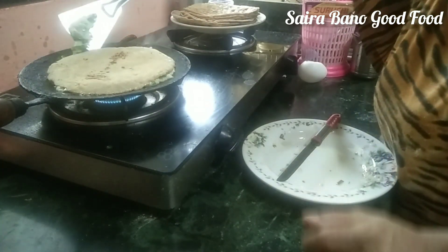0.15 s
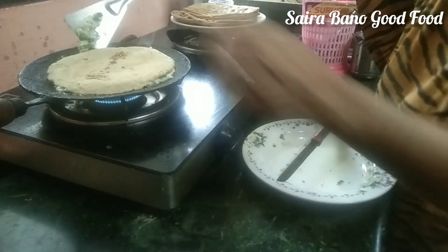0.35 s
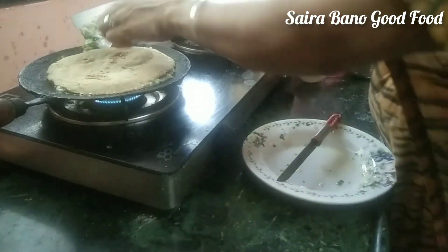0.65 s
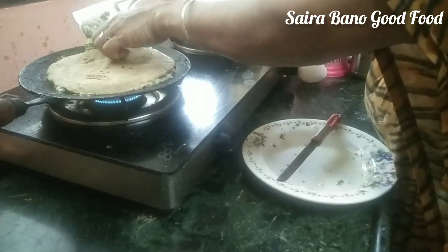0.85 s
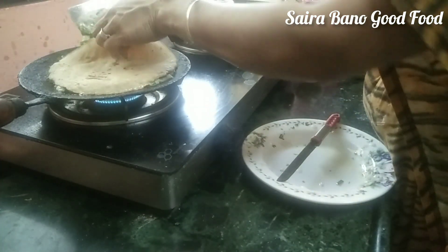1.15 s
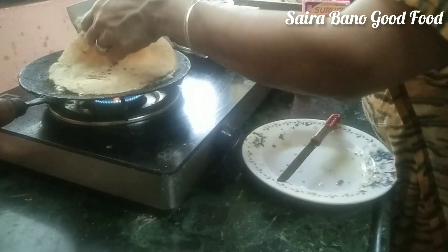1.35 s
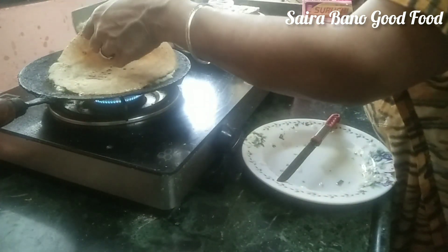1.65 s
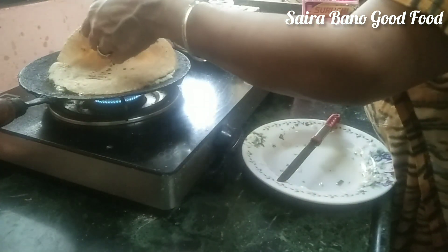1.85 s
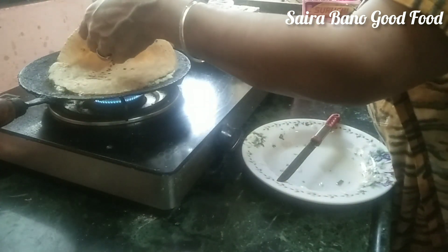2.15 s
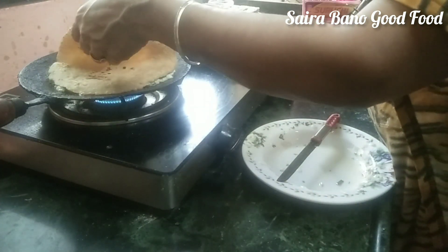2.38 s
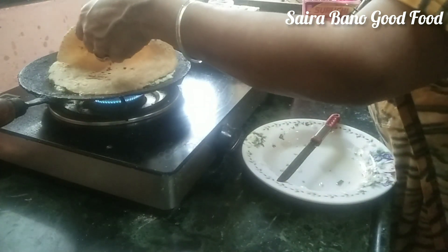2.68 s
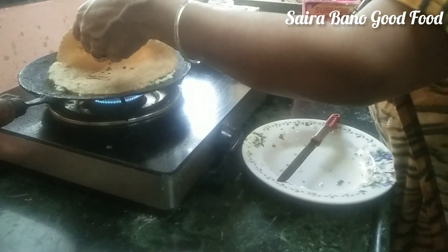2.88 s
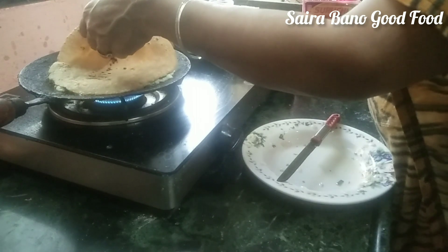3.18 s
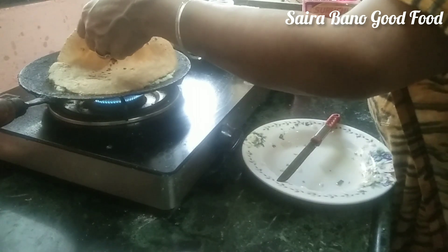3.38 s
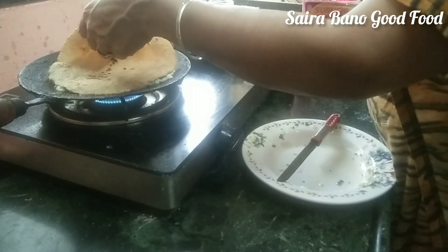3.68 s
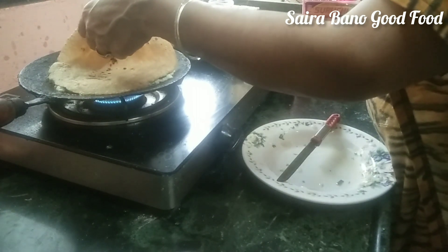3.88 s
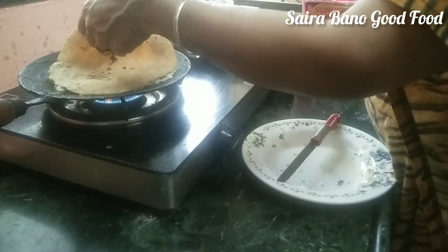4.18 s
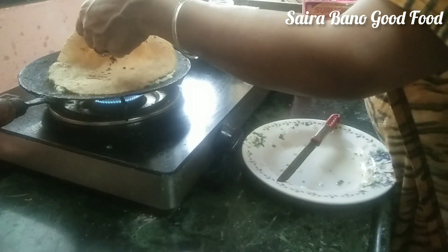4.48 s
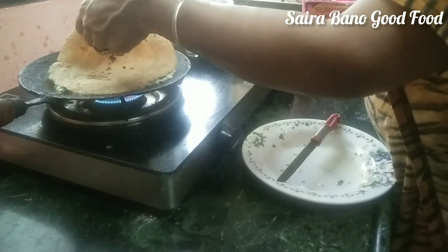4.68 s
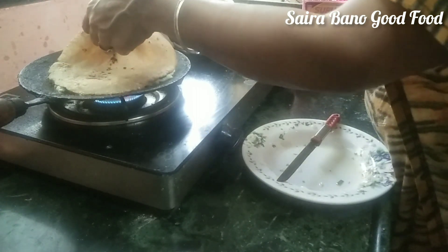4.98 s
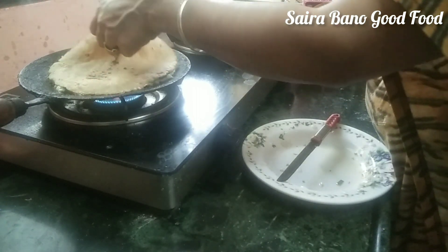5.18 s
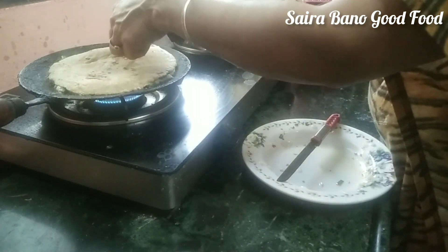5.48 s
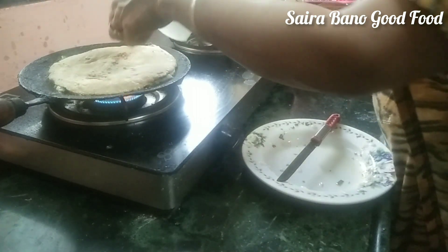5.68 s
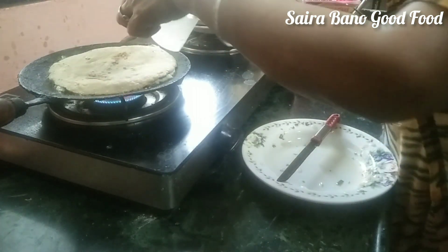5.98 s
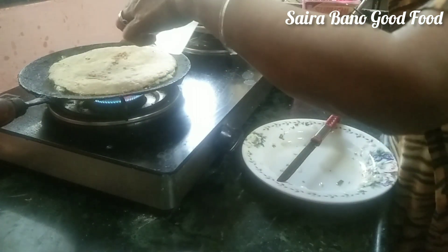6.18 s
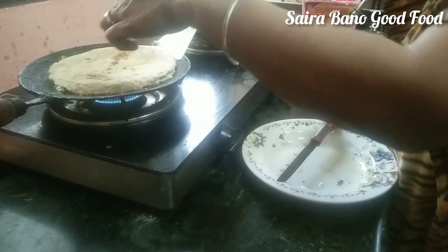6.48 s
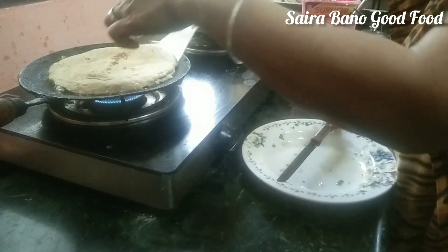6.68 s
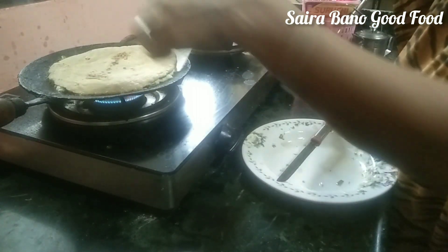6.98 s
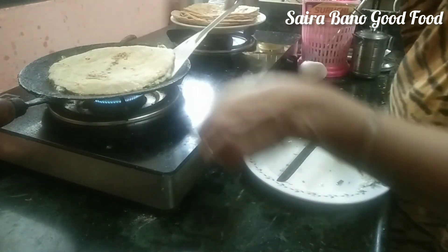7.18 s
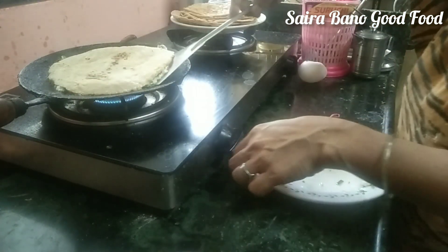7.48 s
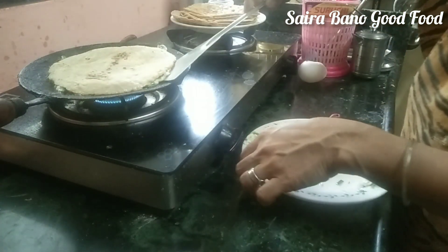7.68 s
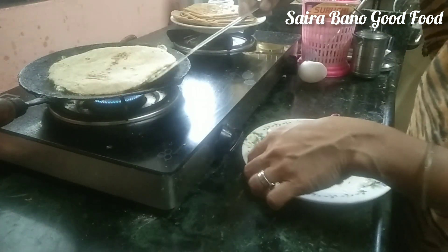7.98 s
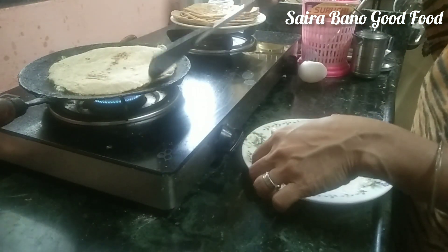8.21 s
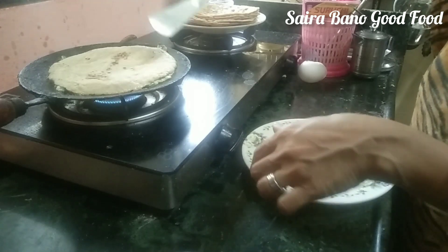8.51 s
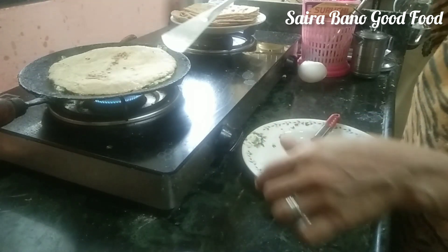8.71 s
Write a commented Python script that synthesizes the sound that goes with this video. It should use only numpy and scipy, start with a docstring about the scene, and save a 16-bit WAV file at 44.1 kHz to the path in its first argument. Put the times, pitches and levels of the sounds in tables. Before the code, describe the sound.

Flatbread fries with bright crackling sizzle and sharp fat spits, calming gradually, while a metal spatula scrapes and taps in a small kitchen.

```python
"""Fat crackles and spits at once: egg-coated flatbread fries on a hot iron pan over a gas flame.
Bubbles ring in the fizz, wet egg surges, and bursting steam pockets click in a small, hard-walled kitchen.
A metal spatula scrapes, slides and taps in resonant modes, thin tones ring, the counter gives a noisy knock.
Soft blips, stove top booms and a low rumble from outside lie under it, with steady noise of flame and air.
A noise suppressor pushes the steady hiss down and lets it through only in narrow flickering patches."""
import sys
import numpy as np
from scipy import signal
from scipy.fft import rfft, irfft, next_fast_len
from scipy.io import wavfile
from scipy.ndimage import uniform_filter1d

SR = 44100
rng = np.random.default_rng(int(sys.argv[2]) if len(sys.argv) > 2 else 0)


def log_audio(samples):
    """Write samples as a 16-bit WAV file to the path given in sys.argv[1]."""
    # one column per channel
    frames = np.atleast_2d(samples).T
    # limit to full scale, then quantise
    limited = np.clip(frames, -1, 1)
    pcm = np.round(limited * 32767).astype(np.int16)
    wavfile.write(sys.argv[1], SR, pcm)


N = 390285

# Vigour of the frying above 5.5 kHz: (t/s, level/dB, level of the part below against it/dB)
FRYING_VIGOUR = [(0.0, -40.5, -0.5), (0.9, -42.5, -3.5), (1.3, -44.5, -4.5), (1.7, -44, -7),
                 (1.92, -45, -7), (2.1, -44, -3.5), (2.32, -46, -13), (2.5, -48.5, -2.5), (3.1, -46, -5),
                 (3.6, -47, -6.5), (3.87, -50.5, -1), (4.14, -47, -6.5), (4.6, -50.5, -8), (4.85, -53, 0),
                 (5.1, -48, 0.5), (5.5, -44, -3.5), (5.75, -45, -5), (5.95, -47.5, -5.5), (6.2, -51.5, -2),
                 (7.3, -58, 5), (7.9, -50.5, -2), (8.35, -51.5, -1), (8.85, -53, 2.5)]
# Spectrum of the frying: (f/Hz, level per Hz/dB)
FRYING_COLOUR = [(1290, -21), (2200, -0.5), (2780, -4.5), (3120, -2.5), (3330, 3), (4720, 5.5), (6210, 2.5),
                 (8370, 8.5), (10400, 3.5), (16000, -6.5)]
# Brightness of the frying above 10 kHz, set before the high part is levelled: (t/s, level/dB)
FRYING_TOP = [(0, -2), (2.2, 1), (3.5, -1), (4.5, 0), (5.2, 1), (5.5, -2), (6.1, 1), (7, -6), (8.85, -15)]
# Wet egg touches hot iron and fizzes: (start t/s, hold/s, low part level/dB, high part level/dB)
EGG_SURGES = [(1.0, 0.19, -49.5, -50), (1.56, 0.024, -47, -55), (1.8, 0.016, -49, -62),
              (1.915, 0.13, -50.5, -48), (2.51, 0.047, -57, -46.5), (2.59, 0.11, -51.5, -47),
              (2.69, 0.013, -48, -59), (3.365, 0.04, -45.5, -51.5), (3.585, 0.021, -42.5, -48),
              (3.795, 0.012, -45, -64.5), (3.828, 0.021, -75, -43), (3.865, .01, -42.5, -48.5),
              (4.03, 0.039, -64, -51), (4.345, 0.13, -53, -50.5), (4.79, 0.019, -51, -46),
              (5.215, 0.018, -43.5, -64), (5.236, 0.013, -39, -61), (5.29, 0.02, -45, -51),
              (5.36, 0.033, -50, -45), (5.75, 0.0069, -43, -55), (6.03, 0.017, -46, -60),
              (6.33, 0.11, -51.5, -47.5), (6.69, 0.028, -50, -65), (7.035, 0.017, -54, -54),
              (7.25, 0.089, -52, -57), (7.73, 0.053, -42, -40.5), (8.158, 0.012, -77, -36.5),
              (8.17, 0.069, -49.5, -54.5), (8.55, 0.1, -47.5, -73)]
SURGE_RISE_S, SURGE_T60_S = 0.001, 0.24
SURGE_STUTTER_DB, SURGE_GRAIN_S = 2.5, 0.012
CRACKLE_SHARE = 0.42  # share of the power at mean vigour; the rest is hiss
SMOOTHING_PER_DB = 0.015  # crackle share lost per dB over the mean: livelier frying blends into hiss


def frying():
    """Dense crackle over hiss in a low and a high part, each lifted by surges of wet egg."""
    level_db, low_db = in_time(FRYING_VIGOUR)
    share = np.clip(CRACKLE_SHARE - SMOOTHING_PER_DB * (level_db - level_db.mean()), 0, 1)
    raw = np.sqrt(share) * crackle() + np.sqrt(1 - share) * rng.standard_normal(N)
    fizz = coloured(raw, FRYING_COLOUR)
    low = filtered(fizz, 3, 5500, "low")
    high = filtered(fizz, 3, 5500, "high")
    top = filtered(high, 2, 10000, "high")
    high = high + (from_db(in_time(FRYING_TOP)[0]) - 1) * top
    surges = swells(EGG_SURGES, SURGE_RISE_S, SURGE_T60_S)
    low_surge, high_surge = surges * uneven(SURGE_STUTTER_DB, SURGE_GRAIN_S)
    # Vigour and surges add in power
    high_gain = np.hypot(from_db(level_db), high_surge)
    low_gain = np.hypot(from_db(level_db + low_db), low_surge)
    return high_gain * rms_one(high) + low_gain * rms_one(low)


CRACKLES_PER_S, CRACKLE_SPREAD_DB = 3000, 4.5
CRACKLE_CYCLES = 5.5  # ring length


def crackle():
    """Tiny bubbles ring a few cycles at pitches dealt at random, about even in level per Hz; rms 1."""
    clicks = grains(CRACKLES_PER_S, CRACKLE_SPREAD_DB)
    dealt = rng.integers(0, 12, N)
    out = 0
    for k, hz in enumerate(np.geomspace(3000, 14000, 12)):
        width_hz = 2.5 * hz / CRACKLE_CYCLES
        out = out + np.sqrt(hz) * resonant(clicks * (dealt == k), [(hz, width_hz, 0)])
    return rms_one(out)


# Sharp clicks of spitting fat and light spatula ticks:
# (t/s, nominal peak level/dB, f/Hz, echo against that peak/dB)
SPIT_CLICKS = [(0.033, -21.5, 5100, -13.5), (0.1667, -16, 8300, -27), (0.237, -20.5, 8600, -31),
               (0.2426, -20, 4860, -19), (0.2575, -23, 8150, -14), (0.381, -26, 8400, -23),
               (0.4697, -35.5, 5600, 2), (0.5102, -23, 7050, -24), (0.5579, -20, 8300, -86),
               (0.5773, -17.5, 5700, -21), (0.67, -23, 8000, -6.5), (0.73, -19.5, 8600, -13),
               (0.758, -27, 8000, -7.5), (0.8677, -16, 8470, -20.5), (0.985, -21.5, 8200, -12.5),
               (1.0005, -25, 4800, -23), (1.0055, -21.5, 4540, -12), (1.057, -22, 5140, -17),
               (1.0686, -27, 4510, -20), (1.1405, -24, 8200, -55), (1.1788, -22, 8900, -27),
               (1.178, -26.5, 4330, -16), (1.3145, -23.5, 7660, -11.5), (1.3594, -28.5, 7900, -8.5),
               (1.4524, -16, 7660, -19), (1.5592, -22, 7550, -14), (1.743, -21, 9400, -26),
               (1.8015, -19, 8800, -21), (1.809, -21, 8530, -17), (1.817, -30, 8500, -27),
               (1.917, -19.5, 9040, -16.5), (2.0067, -18.5, 8000, -13), (2.0539, -17, 8100, -23),
               (2.077, -19, 8240, -22), (2.0904, -20.5, 7100, -26), (2.102, -24, 6900, -39),
               (2.146, -34, 6500, -36), (2.162, -24, 6500, -22), (2.2804, -35.5, 7540, -6),
               (2.485, -35, 6030, -21), (2.6996, -22.5, 6640, -10.5), (2.9028, -23, 6500, -14),
               (2.9717, -26.5, 7760, -36), (3.005, -26.5, 8100, -19), (3.041, -29, 7200, -17),
               (3.053, -30, 7140, -23), (3.0975, -27.5, 7500, -19), (3.1567, -33, 8000, -25),
               (3.2705, -27, 8900, -31.5), (3.218, -31.5, 7500, -6), (3.323, -29, 8500, -12),
               (3.4212, -48, 6130, -1), (3.5872, -22, 7940, -19), (3.6332, -24.5, 8100, -17),
               (3.7575, -35, 7300, -22), (3.8304, -23.5, 7700, -15), (3.869, -26, 3700, -30),
               (3.925, -30, 7240, -14), (4.0267, -24, 8000, -10), (4.058, -22, 8300, -26),
               (4.115, -22, 8400, -25), (4.1827, -27, 8300, -14), (4.197, -31.5, 9500, -23),
               (4.3496, -23.5, 8680, -48), (4.7964, -27, 8650, -18.5), (5.2343, -13.5, 6900, -27),
               (5.245, -19.5, 4900, -13), (5.251, -27, 7200, -27), (5.323, -23.5, 7000, -31),
               (5.369, -22.5, 5100, -29), (5.4091, -22.5, 7300, -25), (5.42, -26, 4900, -20),
               (5.473, -24, 8000, -19), (5.5078, -22, 7950, -18), (5.5465, -22, 10400, -21),
               (5.56, -23.5, 5430, -29), (5.8295, -28, 6500, -9), (6.547, -28.5, 9400, -13.5),
               (6.8455, -38, 2200, -9), (6.9299, -27, 8700, -11), (7.035, -26, 5600, -12.5),
               (7.1932, -31.5, 9400, -8.5), (7.7285, -9.5, 6050, -16), (7.739, -29, 4900, -26),
               (7.789, -39, 8150, -36), (7.857, -29, 8140, -36), (8.0279, -24.5, 9070, -19),
               (7.956, -36, 8050, -34), (8.167, -16, 7660, -13.5), (8.199, -28, 5900, -37),
               (8.263, -32, 6500, -19), (8.4894, -28, 7600, -16), (8.5546, -28.5, 4400, -32),
               (8.6368, -26, 4040, -21)]
SPIT_CYCLES = 4.5  # the decay factor falls 60 dB in this many cycles
SPLUTTER_S, SPLUTTER_DB = 0.0065, -11.5  # latest tick; base level, weighted further by delay
ECHO_DELAY_S, ECHO_T60_S = 0.0032, 0.057
ECHO_OCTAVES = 1  # reach of the echo band either side of the pitch


def spits():
    """A bursting steam pocket or light tick rings a few cycles; the walls return noise of its colour."""
    out = np.zeros(N + SR // 2)
    t = np.arange(SR // 5) / SR
    fizz = np.r_[coloured(grains(8000, 2.5), FRYING_COLOUR), np.zeros(SR // 2)]
    echo_swell = np.clip(t / ECHO_DELAY_S, 0, 1) ** 2 * from_db(-60 * t / ECHO_T60_S)
    for s, peak_db, hz, echo_db in SPIT_CLICKS:
        at = int(s * SR)
        burst = np.sin(2 * np.pi * hz * t) * hz * t * from_db(-60 * t * hz / SPIT_CYCLES)
        burst = 1.2 * burst / np.abs(burst).max()
        # Three smaller ticks splutter after the click, later ones weaker
        ticks = 0
        for lag in rng.uniform(0.13, 1, 3):
            ticks = ticks + (1.2 - lag) * np.roll(burst, int(lag * SPLUTTER_S * SR))
        burst = burst + from_db(SPLUTTER_DB) * ticks
        edges_hz = np.clip([hz * 2 ** -ECHO_OCTAVES, hz * 2 ** ECHO_OCTAVES], 500, 18000)
        echo = rms_one(filtered(fizz[at:at + len(t)], 1, edges_hz, "band"))
        out[at:at + len(t)] += from_db(peak_db) * (burst + from_db(echo_db) * echo_swell * echo)
    return filtered(out[:N], 2, 1800, "high")


# Strokes of the spatula: (start t/s, hold/s, then level/dB of five pan mode groups, lowest first)
SPATULA_STROKES = [(0.999, 0.013, -64, -60, -56.5, -74, -71), (2.478, 0.011, -80, -83, -62, -61, -62),
                   (2.585, 0.083, -81, -87, -64.5, -55.5, -76), (2.792, 0.016, -51.5, -55, -51, -48, -74),
                   (5.226, 0.012, -60, -48, -46, -82, -90), (5.39, 0.12, -90, -75, -59, -57, -77),
                   (5.765, 0.087, -59, -90.5, -57, -63.5, -73), (6.02, 0.034, -94, -105, -82, -59, -59),
                   (6.282, 0.013, -90, -100, -100, -58, -53), (6.299, 0.065, -96, -49, -62, -71, -54.5),
                   (6.383, 0.053, -56, -56, -53, -58, -64), (6.73, 0.012, -79, -77, -51, -85, -93),
                   (6.841, 0.0031, -57, -52, -48.5, -68, -56), (6.914, 0.022, -77, -76, -55, -70, -70),
                   (6.952, 0.032, -95, -87, -46.5, -55.5, -50.5), (7.026, 0.015, -83, -76, -66, -67, -46),
                   (7.198, 0.056, -75, -53.5, -47.5, -58, -65), (7.227, 0.072, -112, -77, -57, -51, -49),
                   (7.53, 0.049, -101, -71, -55.5, -87, -90), (7.685, 0.046, -87, -85, -47, -61, -70),
                   (7.729, 0.01, -55, -66, -60, -51, -50), (8.3, 0.015, -76, -56.5, -53, -71, -75),
                   (8.607, 0.068, -85, -87, -59, -66, -78)]
# Pan mode groups, lowest first, each a list of: (f/Hz, width/Hz, level/dB)
PAN_MODES = [
    [(1050, 52, -11), (1480, 27, -6)],
    [(1570, 71, 0)],
    [(1839, 133, 2), (2037, 28, -4.5), (2200, 170, -4.5)],
    [(2500, 24, 0.5), (2640, 30, 0.5), (2950, 110, 2.5)],
    [(3276, 97, 0.5), (3590, 105, 0), (3880, 100, -5)],
]
SCRAPE_RISE_S, SCRAPE_T60_S = 0.003, 0.41
SCRAPE_STUTTER_DB, SCRAPE_GRAIN_S = 3, 0.018


def scrapes():
    """Dense small catches of the blade excite groups of sharp pan modes, each with its own stutter."""
    catches = grains(1500, 2.5)
    out = 0
    for gain, modes in zip(swells(SPATULA_STROKES, SCRAPE_RISE_S, SCRAPE_T60_S), PAN_MODES):
        rings = 0
        for mode in modes:
            # Ringing twice sharpens the mode; a little of the raw catches keeps its bite
            ring = resonant(resonant(catches, [mode]) + 0.06 * catches, [mode])
            rings = rings + from_db(mode[2]) * uneven(SCRAPE_STUTTER_DB, SCRAPE_GRAIN_S) * ring
        out = out + gain * rms_one(rings)
    return out


# One long slide, two bands sinking together: (t/s, lower band f/Hz, lower level/dB, upper level/dB)
BLADE_SLIDE = [(.17, 1667, -77, -67), (.205, 1620, -61, -59), (.25, 1517, -47, -52),
               (.33, 1480, -43.5, -51), (.37, 1507, -54, -47), (.43, 1466, -62, -56), (.5, 1436, -72, -67)]
SLIDE_RATIO, SLIDE_WIDTH_HZ = 1.33, 55.7  # upper band against lower; width of each


def slide():
    """The sliding blade sounds in two wavering, stuttering bands at a fixed pitch ratio."""
    hz, lower_db, upper_db = in_time(BLADE_SLIDE)
    out = 0
    for db, ratio in ((lower_db, 1), (upper_db, SLIDE_RATIO)):
        tone = wavering(ratio * hz, SLIDE_WIDTH_HZ, rng.standard_normal(N))
        out = out + from_db(db) * uneven(2.0, 0.013) * tone
    return out


# Thin ringing tones: (start t/s, hold/s, level/dB, f/Hz)
THIN_TONES = [(2.509, 0.017, -52, 4740), (2.593, 0.03, -47, 5970), (2.6, 0.025, -57, 4330),
              (5.131, 0.23, -58, 3600), (6.02, 0.052, -53, 4940), (6.039, 0.048, -57, 3990),
              (6.1, 0.34, -59, 4830), (6.303, 0.14, -53, 1570), (6.31, 0.038, -50.5, 4830),
              (7.012, 0.016, -59, 5830), (7.638, 0.032, -57.5, 3580), (7.658, 0.069, -56.5, 2995),
              (7.694, 0.02, -52, 5320), (7.89, 0.091, -57.5, 3464), (8.064, 0.021, -59.5, 3004),
              (8.121, 0.044, -54, 3590), (8.209, 0.012, -57, 2390), (8.275, 0.017, -54.5, 2500)]
THIN_TONE_RISE_S, THIN_TONE_T60_S, THIN_TONE_WIDTH_HZ = 0.003, 0.41, 34.4


def thin_tones():
    """Each row is one narrow, wavering tone, under a shared stutter."""
    out = np.zeros(N + SR // 2)
    t = np.arange(SR // 2) / SR
    for s, hold_s, level_db, hz in THIN_TONES:
        shape = held(t, THIN_TONE_RISE_S, hold_s, THIN_TONE_T60_S)
        tone = wavering(hz, THIN_TONE_WIDTH_HZ, rng.standard_normal(len(t)))
        out[int(s * SR):][:len(t)] += from_db(level_db) * shape * tone
    return out[:N] * uneven(4.2, 0.026)


# Light taps that set the spatula ringing: (t/s, nominal peak level/dB)
SPATULA_TAPS = [(6.7564, -33), (6.877, -32), (6.9263, -31.5), (7.036, -28), (8.028, -44), (8.552, -32.5),
                (8.5785, -29), (8.633, -27.5)]
# Ringing modes of the spatula: (f/Hz, level/dB, t60/s)
SPATULA_MODES = [(3700, -6.5, 0.11), (4400, -30, 0.14), (4960, -3.5, 0.041), (5600, -12.5, 0.076),
                 (6500, -8, 0.1), (7530, -11.5, 0.048), (8470, -12, 0.26), (8700, -15.5, 0.064),
                 (9700, -6, 0.059), (10800, -13, 0.15)]
TAP_RING_DB, TAP_SPREAD_DB = -11, 4.5  # ring against the nominal peak; spread by mode and tap


def taps():
    """Every tap strikes all modes of the spatula, with random strengths of its own."""
    s, peak_db = np.transpose(SPATULA_TAPS)
    out = 0
    for hz, level_db, t60 in SPATULA_MODES:
        own_db = TAP_SPREAD_DB * rng.standard_normal(len(s))
        clicks = np.zeros(N)
        clicks[(s * SR).astype(int)] = from_db(peak_db + level_db + TAP_RING_DB + own_db)
        r, w = from_db(-60 / (t60 * SR)), 2 * np.pi * hz / SR
        out = out + signal.lfilter([0, np.sin(w)], [1, -2 * r * np.cos(w), r * r], clicks + 1e-18)
    return out


# Knock on the counter: (t/s, reference peak level/dB, noise tail against it/dB)
COUNTER_KNOCKS = [(2.795, -29.5, -7)]
KNOCK_LOW_HZ, KNOCK_HIGH_HZ, KNOCK_T60_S = 340, 3300, 0.2


def knocks():
    """A knock on the counter is a burst of mid-band noise that dies away."""
    s, peak_db, tail_db = np.transpose(COUNTER_KNOCKS)
    noise = filtered(rng.standard_normal(N), 4, [KNOCK_LOW_HZ, KNOCK_HIGH_HZ], "band")
    return rms_one(noise) * dying(s, peak_db + tail_db, KNOCK_T60_S)


# Soft short blips of low-mid tone: (t/s, rms level at the crest/dB, f/Hz)
SOFT_BLIPS = [(0.526, -52.5, 700), (1.026, -56, 707), (1.112, -55, 380), (1.716, -48, 437.4),
              (2.197, -54.5, 615), (2.796, -49.5, 597), (3.54, -54.5, 683), (4.144, -51, 605.6),
              (4.415, -50.5, 689), (4.827, -51, 649), (5.462, -56.5, 346), (6.35, -52, 621),
              (6.678, -51.5, 362.4), (6.738, -54.5, 1062), (6.935, -53, 1040), (7.21, -49, 1120),
              (7.26, -52, 619), (7.275, -47, 1118), (7.495, -50, 965), (7.674, -51.5, 623),
              (8.51, -50.5, 349.7), (8.57, -55.5, 885), (8.812, -53, 879)]
BLIP_RISE_S, BLIP_WIDTH = 0.019, 0.14  # time to the crest; width as share of the pitch


def soft_blips():
    """Each blip is a short swell of one wavering tone."""
    out = np.zeros(N + SR // 4)
    t = np.arange(SR // 4) / SR
    swell = t / BLIP_RISE_S * np.exp(1 - t / BLIP_RISE_S)
    for s, peak_db, hz in SOFT_BLIPS:
        tone = wavering(hz, BLIP_WIDTH * hz, rng.standard_normal(len(t)))
        out[int(s * SR):][:len(t)] += from_db(peak_db) * swell * tone
    return out[:N]


# The stove top booms: (start t/s, hold/s, level/dB)
STOVE_BOOMS = [(1.74, 0.054, -54), (1.93, 0.106, -51), (2.925, 0.006, -49), (4.46, 0.0071, -48.5),
               (4.625, 0.022, -48), (5.215, 0.029, -51), (6.66, 0.054, -44.5), (7.56, 0.07, -44),
               (7.82, 0.015, -48.5), (8.54, 0.031, -44), (8.645, 0.0068, -45), (8.78, 0.0092, -47)]
BOOM_HZ, BOOM_WIDTH_HZ = 245.9, 38.1
BOOM_RISE_S, BOOM_T60_S = 0.0053, 0.35


def booms():
    """The stove top booms in one wavering low mode of uneven strength."""
    tone = wavering(BOOM_HZ, BOOM_WIDTH_HZ, rng.standard_normal(N))
    return swells(STOVE_BOOMS, BOOM_RISE_S, BOOM_T60_S)[0] * uneven(1.34, 0.0086) * tone


# Swells of a low rumble from outside: (start t/s, hold/s, level/dB)
OUTSIDE_SWELLS = [(0.0, 0.063, -50), (1.1, 0.11, -49), (1.3, 0.16, -47.5), (2.6, 0.2, -51.5),
                  (2.82, 0.22, -51), (3.3, 0.071, -54.5), (3.66, 0.033, -54), (4.6, 0.059, -56),
                  (5.58, 0.025, -48.5), (5.79, 0.03, -42.5), (6.02, 0.035, -46.5), (7.03, 0.12, -49),
                  (7.39, 0.052, -51), (7.57, 0.16, -49.5), (7.91, 0.037, -47), (8.49, 0.039, -64)]
# Low resonances of the rumble, applied twice: (f/Hz, width/Hz, level per pass/dB)
OUTSIDE_MODES = [(45.4, 13.5, -8.5), (94.9, 32.4, -3)]
RUMBLE_RISE_S, RUMBLE_T60_S, RUMBLE_BED_DB = 0.02, 0.96, -58.5


def rumble():
    """Noise in narrow low resonances swells over a constant bed."""
    noise = resonant(resonant(rng.standard_normal(N), OUTSIDE_MODES), OUTSIDE_MODES)
    swell = swells(OUTSIDE_SWELLS, RUMBLE_RISE_S, RUMBLE_T60_S)[0]
    return np.hypot(swell, from_db(RUMBLE_BED_DB)) * noise


# Spectrum of flame, air and even frying: (f/Hz, level per Hz/dB)
STEADY_COLOUR = [(15, -49), (25, 0.5), (70, 6.5), (145, -6), (249, 1.5), (309, -6), (714, -4.5),
                 (2760, -15.5), (3620, -15), (3920, -19.5), (7920, -27.5), (8500, -16), (8750, -7),
                 (9000, -15), (10100, -19), (14800, -23), (16000, -31)]
STEADY_DB = -46


def steady_noise():
    """Flame, air and even frying blend into noise of one long-term spectrum."""
    return from_db(STEADY_DB) * coloured(rng.standard_normal(N), STEADY_COLOUR)


KITCHEN_T60_S = 0.3


def kitchen(x):
    """Diffuse echo: a decaying noise tail that starts after the first wall."""
    t = np.arange(SR // 2) / SR
    tail = rng.standard_normal(len(t)) * from_db(-60 * t / KITCHEN_T60_S) * (t > .004)
    return signal.fftconvolve(x, tail / np.sqrt(np.sum(tail ** 2)))[:N]


# Narrow lines that come and go in the frying, the spits' grains and the steady noise: (f/Hz, lift/dB before #
# random swelling; negative is a dip)
NARROW_LINES = [(3040, 7), (3610, 7.5), (4010, 4), (4870, 4), (5530, 6.5), (5950, 6.5), (6480, 9),
                (6720, 3.5), (7200, 9), (7480, 7.5), (7960, 5.5), (8470, 3.5), (8700, 5), (9440, 7),
                (9860, 6), (10200, 3.5), (10600, 1), (11300, 7.5), (12300, 1), (12800, -13), (13500, 3)]
LINE_WIDTH_HZ, LINE_COMES_S = 42, 0.07  # width; grain of the coming and going


def coloured(x, spectrum):
    """Shapes white input by a spectrum, with narrow lines coming and going in seven sets; rms 1."""
    hz, db = np.transpose(spectrum)
    size = next_fast_len(N, True)
    grid = np.fft.rfftfreq(size, 1 / SR) + 1
    plain = rfft(x, size) * from_db(np.interp(np.log(grid), np.log(hz), db))
    out = irfft(plain, size)[:N]
    for k in range(7):
        lift_db = 0
        for line_hz, top_db in NARROW_LINES[k::7]:
            lift_db = lift_db + top_db / (1 + (2 * (grid - line_hz) / LINE_WIDTH_HZ) ** 2)
        lines = irfft(plain * (from_db(lift_db) - 1), size)[:N]
        out = out + uneven(3.75, LINE_COMES_S) * lines
    return rms_one(out)


def resonant(x, modes):
    """Parallel resonances with alternating signs; rms 1."""
    out = 0
    for k, (hz, width_hz, db) in enumerate(modes):
        r = np.exp(-np.pi * width_hz / SR)
        ring = signal.lfilter([1, 0, -1], [1, -2 * r * np.cos(2 * np.pi * hz / SR), r * r], x)
        out = out + (-1) ** k * from_db(db) * rms_one(ring)
    return rms_one(out)


def wavering(hz, width_hz, noise):
    """A tone of even level whose phase wanders, so that it fills a band of the given width; rms 1."""
    wander = uniform_filter1d(noise, size=200) * np.sqrt(2 * np.pi * width_hz / SR)
    return np.sqrt(2) * np.sin(np.cumsum(2 * np.pi * hz / SR + wander))


def grains(per_s, spread_db):
    """Random clicks of uneven size and either sign; rms 1."""
    sizes = from_db(spread_db * np.minimum(rng.exponential(1, N), 3.5)) * rng.choice([-1, 1], N)
    return rms_one(sizes * (rng.random(N) < per_s / SR))


def held(t, rise_s, hold_s, t60):
    """Envelope that rises, holds and dies away."""
    return np.clip(t / rise_s, 0, 1) ** 2 * from_db(-60 * np.maximum(t - rise_s - hold_s, 0) / t60)


def swells(rows, rise_s, t60):
    """Gain for each level column: every row rises, holds and dies away; overlaps add in power."""
    t = np.arange(SR) / SR
    power = np.zeros((len(rows[0]) - 2, N + SR))
    for s, hold_s, *levels_db in rows:
        shape = held(t, rise_s, hold_s, t60)
        power[:, int(s * SR):][:, :SR] += np.outer(from_db(levels_db), shape) ** 2
    return np.sqrt(power[:, :N])


def dying(times, levels_db, t60):
    """Envelope that jumps at each time and dies away."""
    clicks = np.zeros(N)
    clicks[(np.asarray(times) * SR).astype(int)] = from_db(levels_db)
    return signal.lfilter([1], [1, -from_db(-60 / (t60 * SR))], clicks + 1e-18)


def uneven(depth_db, grain_s):
    """Random gain of rms 1, drawn at every 16th sample and smoothed twice over the grain."""
    width = max(int(grain_s * SR / 16), 1)
    slow = uniform_filter1d(rng.standard_normal(N // 16 + 2), size=width)
    slow = rms_one(uniform_filter1d(slow, size=width))
    return np.interp(np.arange(N) / 16, np.arange(len(slow)), rms_one(from_db(depth_db * slow)))


def filtered(x, order, hz, kind):
    """Butterworth filter."""
    return signal.sosfilt(signal.butter(order, hz, kind, fs=SR, output="sos"), x)


def from_db(db):
    """Amplitude from dB."""
    return 10 ** (np.asarray(db) / 20)


def rms_one(x):
    """Levels a signal to rms 1."""
    return x / np.sqrt(np.mean(x ** 2) + 1e-20)


def in_time(rows):
    """Columns of a curve table, one value per sample."""
    s, *columns = np.transpose(rows)
    return [np.interp(np.arange(N) / SR, s, column) for column in columns]


KITCHEN_DB, CLICK_ROOM_DB = -20, -13  # send to the kitchen echo: spatula, thin tones and knock; clicks


def scene():
    """Everything at the stove, sharp sounds with their echo, over the rumble and steady noise."""
    clicks = spits()
    near = scrapes() + slide() + thin_tones() + taps() + knocks()
    echo = kitchen(from_db(KITCHEN_DB) * near + from_db(CLICK_ROOM_DB) * clicks)
    background = soft_blips() + booms() + rumble() + steady_noise()
    return (frying() + clicks + near + echo + background)[None]


DEPTH_DB, MARGIN_DB = -19, 0.5  # lowest gain; lift of the noise estimate
MEMORY, SETTLE = 0.94, 0.871  # 0-1: lean on the past gain; smoothing of the measured rise
QUIET_SHARE = 0.19  # quantile of the smoothed band power taken as noise


def suppressor(x):
    """Each narrow band is cut by how little it rises over its quiet level, leaning on the past."""
    bands = signal.stft(x, nperseg=512, noverlap=384)[2]
    power = np.abs(bands) ** 2
    quiet = np.quantile(uniform_filter1d(power, size=40, axis=1), QUIET_SHARE, axis=1)
    # Above the lowest 24 bands the quiet level is the median of its neighbourhood
    quiet = np.r_[quiet[:24], signal.medfilt(quiet, 11)[24:]]
    rise = power / (quiet * from_db(2 * MARGIN_DB))[:, None]
    gains = np.empty_like(power)
    gain, slow = np.ones(len(power)), rise[:, 0]
    for i in range(power.shape[1]):
        fresh = np.maximum(rise[:, i] - 1, 0)
        wanted = MEMORY * gain ** 2 * slow + (1 - MEMORY) * fresh
        gain = np.maximum(wanted / (1 + wanted), from_db(DEPTH_DB))
        gains[:, i] = gain
        slow = SETTLE * slow + (1 - SETTLE) * rise[:, i]
    gains[:2] = uniform_filter1d(gains[:2], size=60, axis=1)  # the bass bands follow slowly
    return signal.istft(bands * gains, nperseg=512, noverlap=384)[1][:N]


CUTOFF_HZ = 15750


def record(dry):
    """The microphone drops the deepest bass; noise suppression, then the top is cut steeply."""
    bass_cut = filtered(dry[0], 4, 38, "high")
    top_cut = signal.ellip(10, .5, 60, CUTOFF_HZ, fs=SR, output="sos")
    return signal.sosfilt(top_cut, suppressor(bass_cut))[None]


dry = scene()
out = record(dry)
log_audio(out)
```